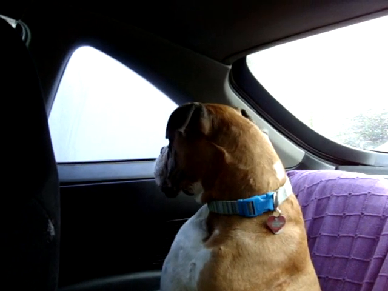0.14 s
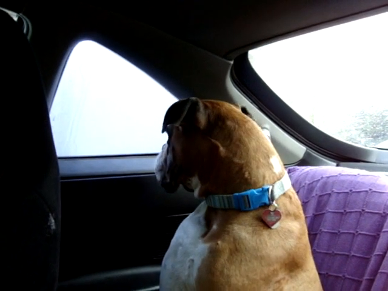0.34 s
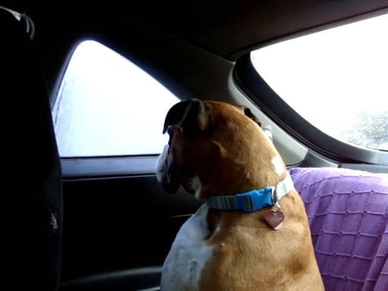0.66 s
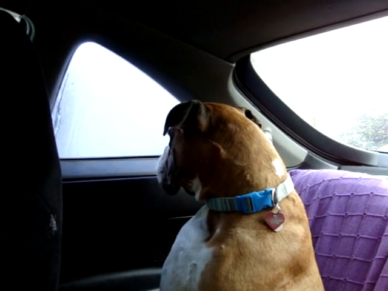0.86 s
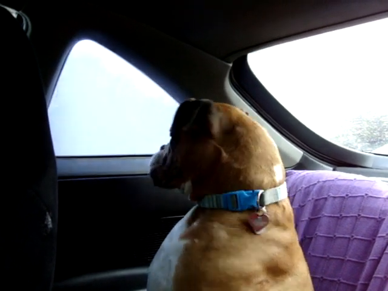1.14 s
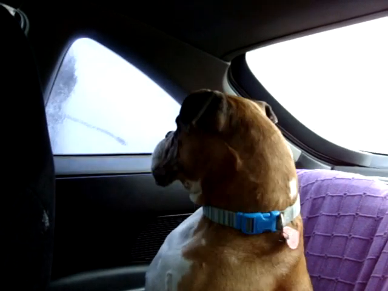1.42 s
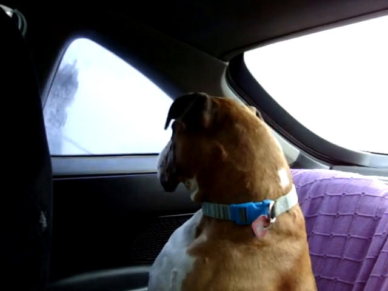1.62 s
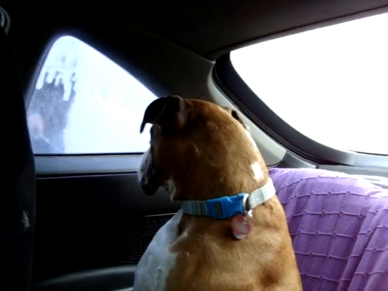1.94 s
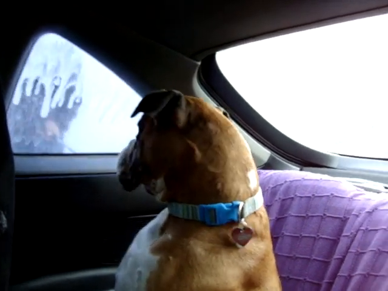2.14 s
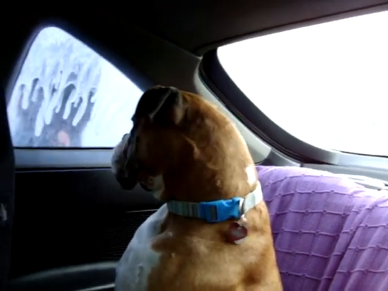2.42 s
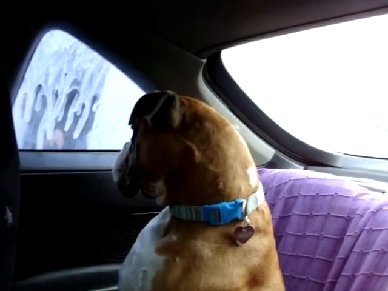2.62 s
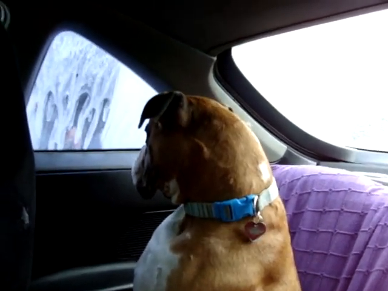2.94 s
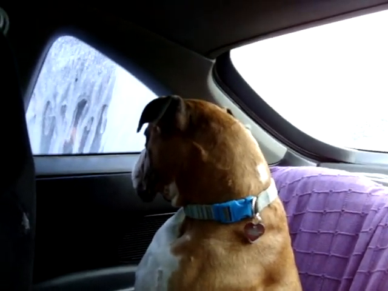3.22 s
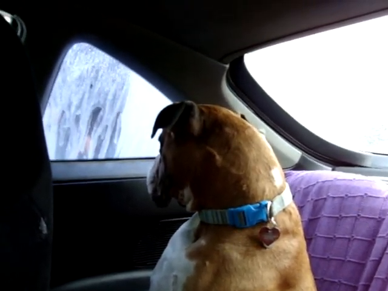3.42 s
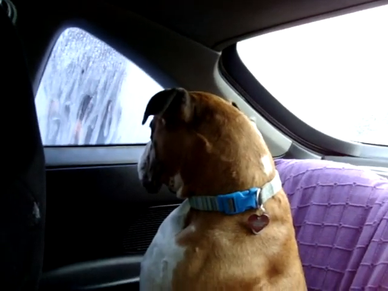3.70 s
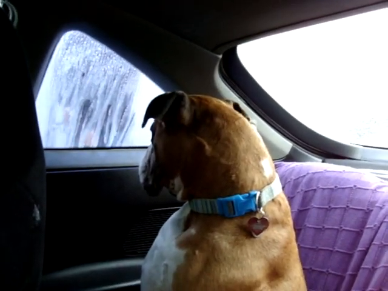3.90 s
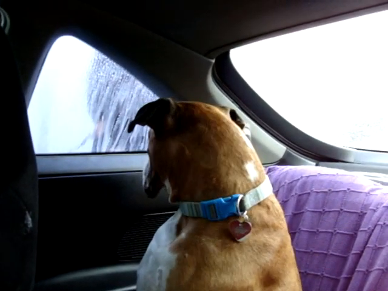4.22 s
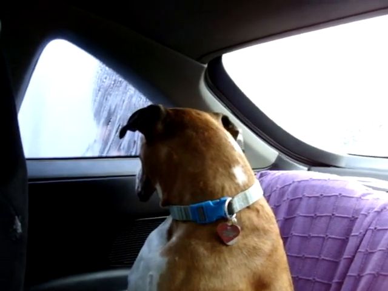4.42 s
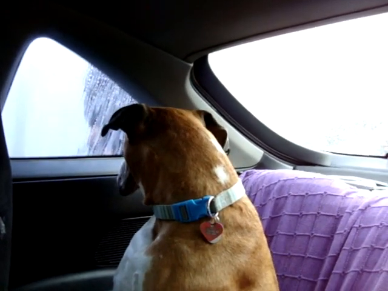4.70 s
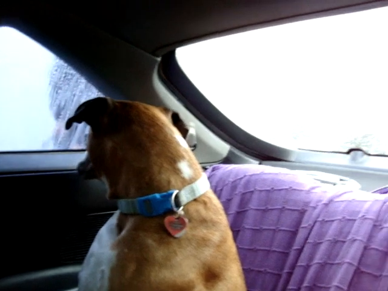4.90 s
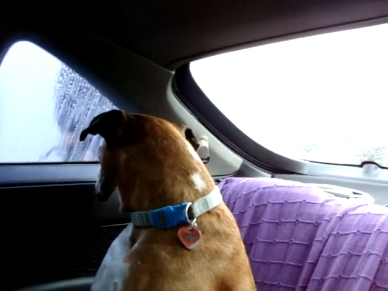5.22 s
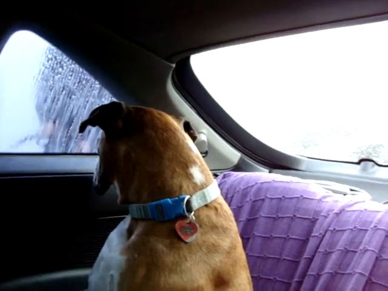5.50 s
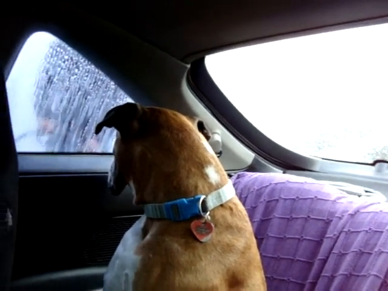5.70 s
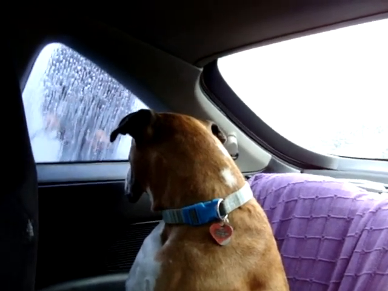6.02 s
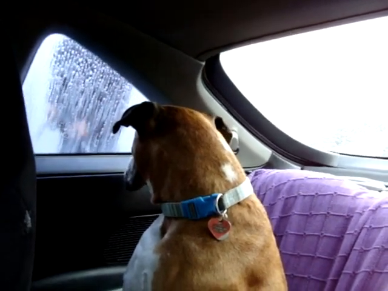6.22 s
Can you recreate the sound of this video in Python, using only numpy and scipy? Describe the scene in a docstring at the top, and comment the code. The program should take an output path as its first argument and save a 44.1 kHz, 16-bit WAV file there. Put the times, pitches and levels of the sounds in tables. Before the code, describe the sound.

Muffled car-wash brushes thump on bodywork and water rushes over glass, easing to a lull and surging again, with small bright tag clinks.

```python
"""An automatic car wash heard from the back seat of a closed car, on a single microphone.
From the start wet brushes drum on the body, jets splash the near windows and fine spray hisses:
random impacts, coloured by surface and by the cabin. A motor, a wavering sine, hums outside.
Spots ring briefly as jets cross them. From 1.35 to 2.7 s the metal tag on a dog's collar clinks close by,
two decaying modes after a tick. From 2.9 s a few single brush strips slap the body, short noise bursts."""
import sys
import numpy as np
from scipy import signal
from scipy.fft import rfft, irfft, next_fast_len
from scipy.io import wavfile

SR = 44100
rng = np.random.default_rng(int(sys.argv[2]) if len(sys.argv) > 2 else 0)


def wav_out(sig):
    """Save sig, one row per channel (or a flat mono array), as 16-bit PCM at SR to the path in sys.argv[1]."""
    wavfile.write(sys.argv[1], SR, np.round(np.clip(np.atleast_2d(sig).T, -1, 1) * 32767).astype(np.int16))


N = 280035
TIME = np.arange(N) / SR
STEPS = TIME[::40]  # coarse time steps for the slow levels


def from_db(db):
    """Decibels to amplitude gain."""
    return 10 ** (np.asarray(db) / 20)


def rms_one(x):
    """Scale to unit power."""
    return x / np.sqrt(np.mean(x ** 2) + 1e-20)


def drift(rate_hz):
    """Smooth chance with spread 1: white noise whose spectrum falls away above rate_hz."""
    hz = np.arange(N // 2 + 1) * SR / N
    spectrum = rfft(rng.standard_normal(N))
    return rms_one(irfft(spectrum / (1 + (hz / rate_hz) ** 2), N))


def coloured(x, spectrum):
    """Give x a spectrum of (Hz, dB) points, falling away beyond its ends; rms 1."""
    size = next_fast_len(N)
    hz = np.maximum(np.arange(size // 2 + 1) * SR / size, 1)
    points_hz, points_db = np.transpose(spectrum)
    gain = from_db(np.interp(np.log(hz), np.log(points_hz), points_db))
    low_end = np.minimum(hz / points_hz[0], 1)
    high_end = np.minimum(points_hz[-1] / hz, 1) ** 2
    return rms_one(irfft(rfft(x, size) * gain * low_end * high_end, size)[:N])


def resonance(x, hz, width_hz):
    """Two-pole resonance with gain 1 on top."""
    r = np.exp(-np.pi * width_hz / SR)
    numerator = np.array([1, 0, -1]) * (1 - r * r) / 2
    denominator = [1, -2 * r * np.cos(2 * np.pi * hz / SR), r * r]
    return signal.lfilter(numerator, denominator, x)


def drops(per_s, size_db, clump_db, clump_hz):
    """Random impacts, many small and few large, that arrive in gushes."""
    hit = rng.random(N) < per_s / SR
    sizes = from_db(size_db * np.minimum(rng.exponential(1, N), 4))
    signs = rng.choice([-1, 1], N)
    gushes = from_db(clump_db * drift(clump_hz))
    return rms_one(hit * sizes * signs * gushes)


def swell_db(start_s, hold_s, rise_s, fall_s):
    """One pass in dB below its peak: it arrives, stays and moves on, ever faster away from the peak."""
    before = np.maximum((start_s - STEPS) / rise_s, 0)
    after = np.maximum((STEPS - start_s - hold_s) / fall_s, 0)
    return -19.5 * (before + after) ** 1.34  # 19.5 dB down at one rise or fall time


def together_db(levels_db):
    """Unrelated sounds add in power; their level at every sample."""
    power = sum(10 ** (np.maximum(db, -200) / 10) for db in levels_db)
    return np.interp(TIME, STEPS, 10 * np.log10(power))


def brush_levels():
    """Control levels on roof and door: the far wash plus every pass of a brush leaning on the body."""
    # brush passes: start_s (full contact), hold_s, rise_s, fall_s, roof_db, door_db (peaks before trim)
    brush_passes = [(0.0, 0.35, .1, 0.27, -39.5, -24.5), (0.643, 0.34, 0.25, .12, -49, -26.5),
                    (1.012, 0.063, .08, 0.27, -43, -25.5), (1.326, 0.16, 0.12, 0.16, -48, -30.5),
                    (1.51, 0.14, 0.077, 0.052, -41, -25), (1.687, .3, 0.025, 0.3, -39.5, -22.5),
                    (2.151, .04, .08, 0.14, -38, -29), (2.447, .15, 0.46, 0.49, -46, -45),
                    (2.855, 0.26, 0.32, 0.18, -42.5, -40.5), (3.27, 0.05, 0.16, 0.35, -33, -29),
                    (3.545, .27, 0.017, 0.093, -34, -32), (3.817, 0.023, 0.33, 0.27, -39.5, -25.5),
                    (3.99, 0.044, 0.13, 0.29, -36.5, -30.5), (4.248, 0.073, 0.017, .1, -37.5, -30),
                    (4.345, 0.029, 0.11, 0.25, -33.5, -21), (4.461, 0.063, .1, .2, -36, -27),
                    (4.875, .01, 0.087, 0.12, -49, -30.5), (5.043, 0.34, 0.39, 0.11, -48, -37.5),
                    (5.797, 0.3, 0.087, 0.18, -39.5, -33.5), (6.117, 0.19, 0.15, .1, -47, -25.5)]
    roof, door = [-57], [-49]  # the wash further off, always there, dB
    for start_s, hold_s, rise_s, fall_s, roof_db, door_db in brush_passes:
        swell = swell_db(start_s, hold_s, rise_s, fall_s)
        roof.append(roof_db + swell)
        door.append(door_db + swell)
    return together_db(roof), together_db(door)


def body_drumming(roof_db, door_db):
    """Wet strips and heavy drops beat on the sheet metal."""
    # colour of impacts on the roof: pitch_hz, density_db (per Hz)
    roof_colour = [(25, -30.5), (55, -26), (85, -15.5), (113, -5.5), (140, -0.5), (170, -3), (205, 1),
                   (245, 3.5), (300, 1), (480, -6.5), (900, -24)]
    # colour of impacts on the door: pitch_hz, density_db (per Hz)
    door_colour = [(90, -42), (190, -26.5), (280, -10.5), (370, -3), (480, -2), (620, 1.5), (800, -3),
                   (1100, -10), (1700, -20), (2700, -21), (3400, -45), (9000, -43)]
    roof = coloured(drops(per_s=4000, size_db=2, clump_db=1, clump_hz=15), roof_colour)
    door = coloured(drops(per_s=5000, size_db=1.5, clump_db=1.3, clump_hz=35), door_colour)
    roof_trim_db, door_trim_db = -1.3, -4.0
    return from_db(roof_db + roof_trim_db) * roof + from_db(door_db + door_trim_db) * door


def jet_levels():
    """Control levels of glass and spray, and lift of the spray's top: the far wash plus every jet sweep."""
    # jet sweeps over the near windows: start_s (full on), hold_s, rise_s, fall_s,
    # glass_db, spray_db (peaks before trim), aim_db (lift of the spray's top before trim)
    jet_passes = [(0.02, 0.049, 0.2, 0.61, -22, -23.5, -26), (0.378, 0.088, 0.23, 0.068, -22.5, -23.5, -22),
                  (0.488, .07, .05, .05, -28.5, -35.5, 7), (0.574, .33, .02, 0.54, -23.5, -23.5, -24),
                  (1.019, 0.12, 0.15, .15, -24, -30.5, -28), (1.208, 0.0096, 0.044, 0.16, -29.5, -28, -27),
                  (1.328, 0.063, 0.073, 0.45, -26.5, -33.5, 1.5), (1.51, 0.14, 0.07, 0.022, -23, -33, -1),
                  (1.679, 0.51, 0.048, 0.083, -24.5, -31, -26), (1.807, 0.087, 0.21, 0.27, -25, -27.5, -22),
                  (2.897, 0.076, .3, .3, -50, -53.5, -5), (3.157, 0.025, 0.06, .05, -45.5, -43, -4),
                  (3.26, 0.041, 0.04, 0.12, -31.5, -34, 3.5), (3.698, 0.29, 0.38, 0.074, -38, -43.5, -14.5),
                  (3.857, 0.058, 0.092, 0.08, -26, -21.5, -9), (4.456, .09, .2, 0.17, -25.5, -29, -18),
                  (4.672, .11, 0.23, 0.13, -33.5, -28.5, 11.5),
                  (4.873, 0.0078, 0.051, 0.085, -31.5, -47.5, 0),
                  (4.966, 0.084, .03, .03, -40.5, -51, 12.5), (5.16, 0.16, .45, 0.23, -38, -47, 0),
                  (5.45, 0.049, 0.2, 0.39, -40, -45.5, 14), (5.742, 0.032, 0.076, 0.22, -38, -46, 5),
                  (6.096, .05, 0.048, 0.24, -22.5, -24.5, -19), (6.21, 0.23, 0.11, .2, -27.5, -23.5, -2.5)]
    focus = 1.425  # the spray's edges are this much steeper in dB than those of the splash
    glass, spray, top = [-48.5], [-51], [-51 + 4]  # the wash further off, always there, dB
    for start_s, hold_s, rise_s, fall_s, glass_db, spray_db, aim_db in jet_passes:
        swell = swell_db(start_s, hold_s, rise_s, fall_s)
        glass.append(glass_db + swell)
        spray.append(spray_db + focus * swell)
        top.append(spray[-1] + aim_db)
    spray_db = together_db(spray)
    return together_db(glass), spray_db, together_db(top) - spray_db


def window_splash(level_db):
    """Water on the glass: separate drops when far, a dense rush under the jet."""
    # colour of impacts on the window: pitch_hz, density_db (per Hz)
    window_colour = [(120, -42), (300, -24.5), (600, -5), (950, 1.5), (1400, 0.5), (1750, -4), (2300, -5),
                     (3000, -6), (4200, -10), (7000, -31.5), (10000, -52)]
    per_s = 9000 * from_db(0.45 * (level_db + 25))
    impacts = drops(per_s, size_db=2.5, clump_db=0.94, clump_hz=31)
    trim_db = -1.5
    return from_db(level_db + trim_db) * coloured(impacts, window_colour)


def fine_spray(level_db, aim_db):
    """Small droplets hiss, denser as the level rises, the top lifted by aim_db, which differs by pass."""
    # colour of the fine droplets: pitch_hz, density_db (per Hz)
    spray_colour = [(900, -10.5), (2000, -4), (2900, 0.5), (3900, 1), (5000, -2), (6500, -6.5), (8000, -11),
                    (10000, -16.5)]
    per_s = 16000 * from_db(0.4 * (level_db + 28.5))
    hiss = coloured(drops(per_s, size_db=2.0, clump_db=1.0, clump_hz=35), spray_colour)
    top = signal.sosfilt(signal.butter(1, 7000, "high", fs=SR, output="sos"), hiss)
    trim_db, top_trim_db = -1.0, -1.5
    return from_db(level_db + trim_db) * (hiss + from_db(aim_db + top_trim_db) * top)


def cabin(x):
    """Panels and cabin air lift their own pitches, and weaken one, by adding resonances to x."""
    # resonances of panels and cabin: pitch_hz, width_hz, lift_db (of each one alone)
    modes = [(112, 10, 1), (396, 43, 4.5), (612.7, 14.7, 8), (720, 87, 4), (882, 38, 5.5), (1138, 75, 3),
             (1280, 45, 4), (1561, 22, 6), (1955, 25, 5.5), (2160, 89, 4), (2362, 27, 5.5), (2588, 40, 5),
             (2737, 50, 6.5), (3012, 37, 3), (3530, 32, 3), (3750, 60, 4), (4005, 45, 4.5), (4406, 94, 4.5),
             (4420, 42, -8), (5320, 92, 3)]
    coloration = sum((from_db(lift_db) - 1) * resonance(x, hz, width_hz) for hz, width_hz, lift_db in modes)
    return x + coloration


def motor(door_db):
    """A wavering hum that sags a little and comes through louder while a brush presses on the body."""
    idle_hz, sag_hz = 145.1, 2.47  # idle pitch, its drop under the hardest brush
    waver_hz, waver_db, waver_rate_hz = 1.34, 2.5, 3.3  # spread of chance in pitch and level
    air_db, contact_db = -60.5, -27.5  # through the air; through a brush, relative to door_db
    load = from_db(door_db - door_db.max())
    hz = idle_hz - sag_hz * load + waver_hz * np.sqrt(load) * drift(waver_rate_hz)
    level = from_db(air_db) + from_db(contact_db + door_db)
    wavering = level * from_db(waver_db * drift(waver_rate_hz))
    return wavering * np.sqrt(2) * np.sin(2 * np.pi * np.cumsum(hz) / SR)


def stray_rings(glass_db, count):
    """Faint rings at random spots, following the strength of the water: rows like those of the set rings."""
    lowest_hz, highest_hz = 555, 2360
    width_share, relative_db, spread_s = 0.074, -5, 0.019  # width / pitch, level re the glass
    when, pitch = rng.random((count, 2)).T
    at = (when * (N - 1)).astype(int)
    pitches = lowest_hz * (highest_hz / lowest_hz) ** pitch
    return [(i / SR, hz, width_share * hz, glass_db[i] + relative_db, spread_s)
            for i, hz in zip(at, pitches)]


def ringing_spots(strays):
    """A panel resonance, noise through two equal filters, swells and fades as a jet passes over it."""
    # set rings: centre_s, pitch_hz, width_hz (of each filter), level_db (before trim),
    # spread_s (standard deviation of the bell-shaped swell)
    set_rings = [(0.555, 640, 100, -24, 0.018), (0.922, 3110, 159, -31.5, 0.39),
                 (1.041, 940, 122, -32, 0.063), (1.276, 535, 106.6, -29, 0.046),
                 (1.338, 3150, 600, -26.5, 0.047), (1.393, 293, 99, -31.5, 0.061),
                 (1.599, 1090, 450, -24.5, 0.022), (1.951, 696, 80, -43, 0.078),
                 (3.283, 1076, 140, -29, 0.024), (4.002, 2500, 420, -33.5, 0.02),
                 (4.308, 2680, 500, -32, 0.011), (4.356, 399, 60.6, -26.5, 0.057),
                 (4.373, 658, 90, -21.5, 0.029), (4.478, 667, 70.7, -20, 0.046),
                 (4.481, 2750, 150, -29, 0.085), (4.58, 574, 70, -25.5, 0.04), (4.63, 3770, 160, -33, 0.02),
                 (4.82, 2770, 198, -35, 0.068), (4.879, 710, 130, -31.5, 0.025),
                 (5.05, 1460, 198, -41.5, 0.019), (5.24, 2800, 350, -41, .04), (5.48, 624, 79, -32, 0.039),
                 (5.757, 1750, 170, -31.5, 0.012), (5.76, 2220, 241, -40, 0.011),
                 (5.812, 527, 70, -27, 0.019), (5.95, 340, 110, -39, 0.066)]
    trim_db = -2
    out = np.zeros(N)
    for centre_s, hz, width_hz, level_db, spread_s in list(set_rings) + strays:
        near = np.abs(TIME - centre_s) < 0.5
        noise = rng.standard_normal(near.sum())
        tone = resonance(resonance(noise, hz, width_hz), hz, width_hz)
        swell = np.exp(-0.5 * ((TIME[near] - centre_s) / spread_s) ** 2)
        out[near] += from_db(level_db + trim_db) * rms_one(tone) * swell
    return out


def collar_tag():
    """Each touch ticks and rings two close modes, choked when the tag lands on its ring again."""
    # swings of the tag against its ring: start_s, lower_db, upper_db (modes before trim),
    # free_s (time until it is caught again)
    clinks = [(1.350, -37, -38, .016), (1.368, -41, -39, .022), (1.424, -41, -34, .024),
              (1.529, -24, -42, .013), (1.562, -41, -44, .012), (1.595, -35, -37, 0.015),
              (1.618, -38, -36, .022), (1.661, -13.5, -38, 0.021), (1.712, -23, -35, .03),
              (2.231, -31, -44, 0.028), (2.32, -36, -29, 0.011), (2.38, -52, -47, 0.0064),
              (2.43, -30, -31.5, 0.0088), (2.466, -66, -54, 0.029), (2.537, -39, -43, 0.012),
              (2.597, -36, -31, 0.02), (2.679, -45, -37.5, .0098)]
    # the tag's lower and upper mode: pitch_hz
    tag_hz = [6988, 7364]
    free_t60_s, caught_t60_s = 0.084, 0.023  # free decay; the extra damping once caught, taken alone
    lower_trim_db, upper_trim_db = 0.5, 6.0
    out = np.zeros(N)
    t = np.arange(SR // 8) / SR
    for start_s, lower_db, upper_db, free_s in clinks:
        decay = from_db(-60 * (t / free_t60_s + np.maximum(t - free_s, 0) / caught_t60_s))
        gains = from_db([lower_db + lower_trim_db, upper_db + upper_trim_db])
        ring = gains @ np.sin(2 * np.pi * np.outer(tag_hz, t)) * decay
        contact = np.exp(-t / 0.0008)  # s
        tick = from_db(-13) * gains.sum() * rng.standard_normal(len(t)) * contact
        start = round(start_s * SR)
        out[start:start + len(t)] += ring * (1 - contact) + tick
    return out


def strip_slaps(level_db, decay_s):
    """A wet strip lands at once and its splash dies in a few milliseconds."""
    # single brush strips on the body: start_s, peak_db (relative to level_db)
    slaps = [(2.875, -27), (3.547, -32), (4.254, -26.5), (5.864, -24), (5.933, -22.5)]
    # colour of a slap: pitch_hz, density_db (per Hz)
    slap_colour = [(150, -14), (380, 3), (620, 3), (1000, -1), (2000, -20), (4000, -30), (9000, -20)]
    splash = sum(from_db(peak_db) * (TIME >= start_s) * np.exp(-np.abs(TIME - start_s) / decay_s)
                 for start_s, peak_db in slaps)
    return from_db(level_db) * splash * coloured(rng.standard_normal(N), slap_colour)


def scene():
    """Water and motor come through the shell; the tag is inside, near the single microphone."""
    roof_db, door_db = brush_levels()
    glass_db, spray_db, aim_db = jet_levels()
    body = body_drumming(roof_db, door_db) + strip_slaps(level_db=-10.5, decay_s=0.0073)
    water = body + window_splash(glass_db) + fine_spray(spray_db, aim_db)
    rings = ringing_spots(stray_rings(glass_db, count=30))
    mono = cabin(water) + rings + motor(door_db) + collar_tag()
    return np.array([mono, mono])


def record(dry):
    """The recorder rounds the highest peaks and cuts the top steeply."""
    rounded = np.tanh(dry)
    top_cut = signal.ellip(12, 0.2, 80, 10250, fs=SR, output="sos")  # ripple dB, stop dB, cutoff Hz
    return signal.sosfilt(top_cut, rounded)


dry = scene()
out = record(dry)
wav_out(out)
```